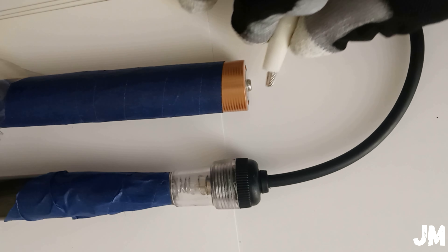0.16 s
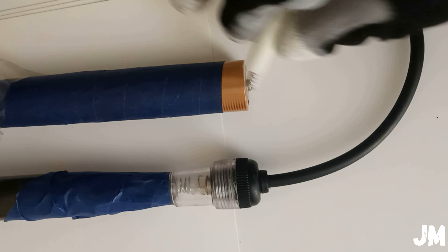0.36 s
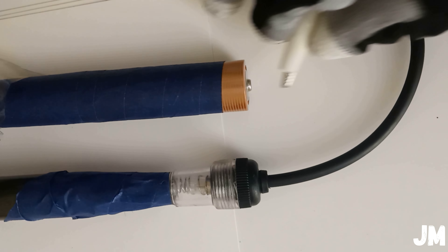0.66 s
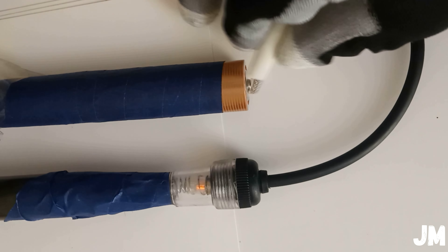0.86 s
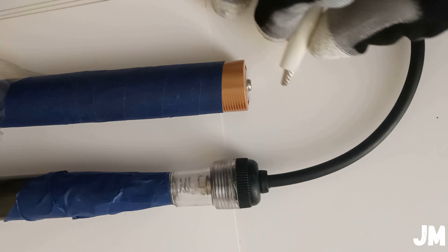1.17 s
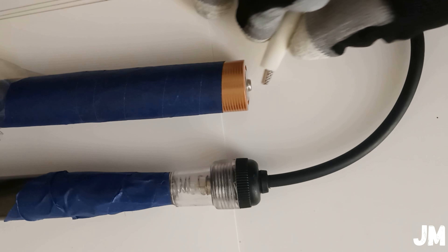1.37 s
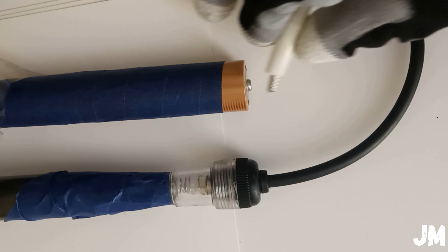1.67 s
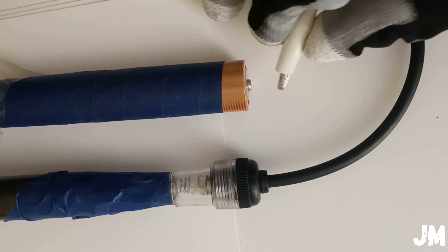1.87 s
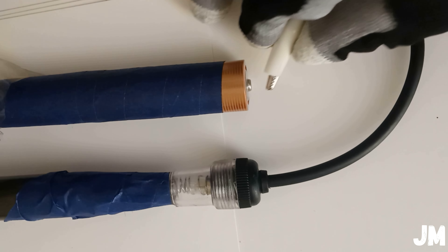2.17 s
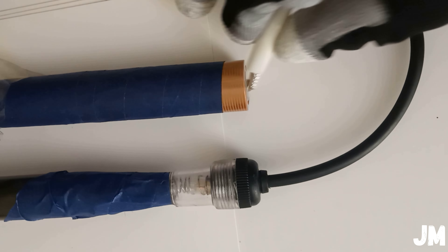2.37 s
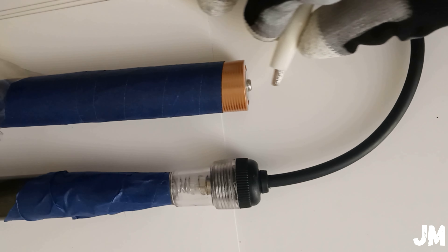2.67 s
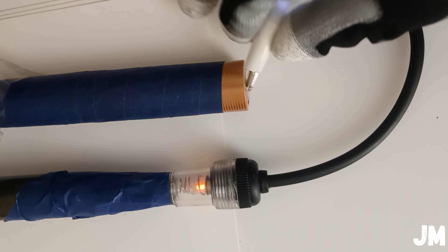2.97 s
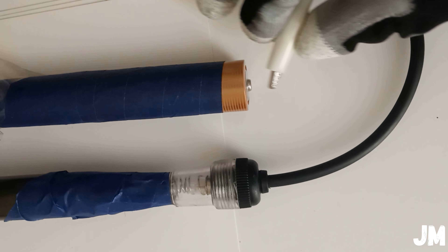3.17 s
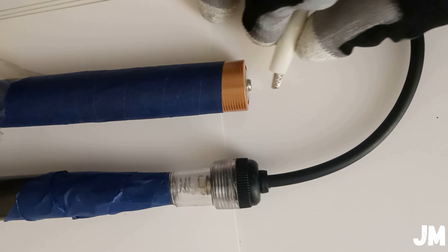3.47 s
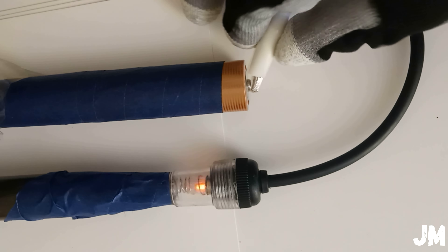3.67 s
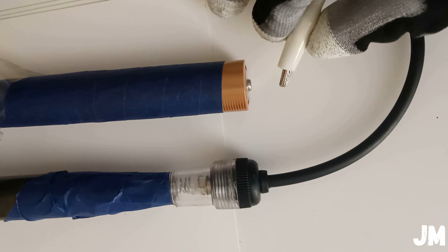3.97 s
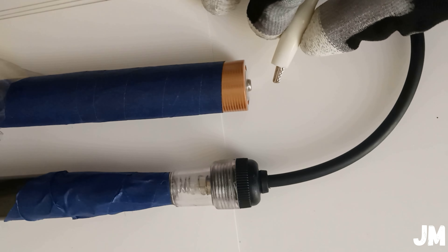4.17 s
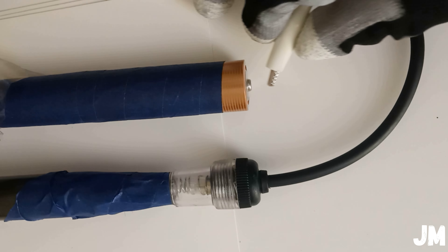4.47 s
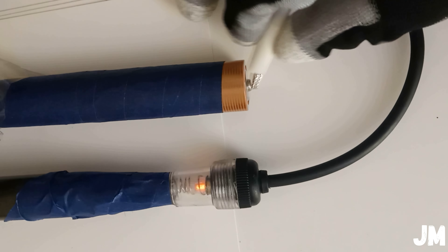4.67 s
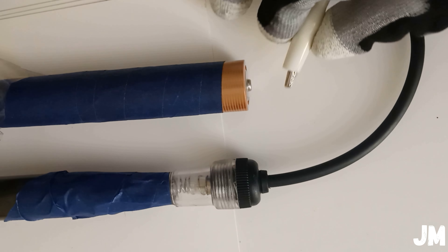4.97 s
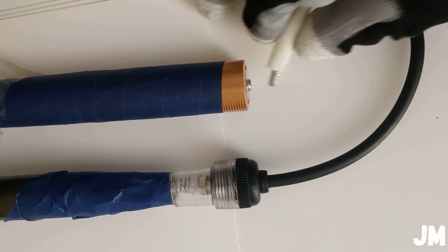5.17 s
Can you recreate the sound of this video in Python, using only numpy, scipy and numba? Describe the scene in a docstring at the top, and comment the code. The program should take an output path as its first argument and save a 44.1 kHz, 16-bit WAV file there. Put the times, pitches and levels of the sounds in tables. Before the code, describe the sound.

Quiet low hum and airy hiss, then hard electrical snaps: seven tight clusters over about five seconds, spaced fairly evenly. Each begins with a faint contact tick, then very loud, crisp cracks with a plasticky ring, a quick wall slap and a short reverberant fade. A gloved hand brushes the bench faintly at the start and more clearly before the sixth cluster. Close, slightly clipped phone sound.

```python
"""A small hard room with a bench: a wire is touched to a battery terminal, and a coil fires bursts of sparks
in a small plastic tester. Each snap is a shock and a crack of noise that ring the tester; it comes back
from a near wall and dies away in the room. A motor beats against the mains hum, with a fan, a whine, hissing
air and a faint tone that comes and goes. A glove brushes the bench twice.
A look-ahead limiter in the phone ducks everything around the snaps."""
import sys
import numpy as np
from scipy import signal
from scipy.fft import rfft, irfft, next_fast_len
from scipy.io import wavfile
from scipy.ndimage import uniform_filter1d, minimum_filter1d
from numba import njit

SR = 44100
rng = np.random.default_rng(int(sys.argv[2]) if len(sys.argv) > 2 else 0)


def natural_amplitude(level_db):
    """Convert a level in decibels to a linear amplitude factor, elementwise."""
    exponent = np.asarray(level_db, float) / 20
    return 10 ** exponent


def put_to_file(sound):
    """Save the sound as 16-bit audio at rate SR, in the file named by the first command-line argument."""
    columns = np.atleast_2d(sound).T  # one column per channel
    safe = np.clip(columns, -1, 1)
    whole_steps = np.round(safe * 32767)
    wavfile.write(sys.argv[1], SR, whole_steps.astype(np.int16))


N = 234819  # length of the scene in samples


def shade(x, table):
    """Colours a sound to follow (Hz, dB) points, with a minimum-phase filter that never sounds early."""
    hz, db = np.transpose(table)
    log_hz = np.log(np.fft.rfftfreq(2048, 1 / SR) + 1)
    log_gain = np.log(natural_amplitude(np.interp(log_hz, np.log(hz), db)))
    # folding the cepstrum onto positive times makes the filter causal
    fold = np.r_[1, 2 * np.ones(1023), 1, np.zeros(1023)]
    impulse = irfft(np.exp(rfft(irfft(log_gain) * fold)))
    return signal.fftconvolve(x, impulse)[:len(x)]


def unit(x):
    """Scales a sound to a root mean square of 1."""
    return x / np.sqrt(np.mean(x ** 2))


def walk(rate, size=N):
    """Random levels held 1 / rate seconds and smoothed twice; their spread is near 1."""
    hold = int(SR / rate)
    steps = np.repeat(rng.standard_normal(size // hold + 1), hold)
    return 1.3 * uniform_filter1d(uniform_filter1d(steps, hold), hold)[:size]


def add(out, x, s):
    """Mixes x into out from time s in seconds."""
    i = int(s * SR)
    out[i:i + len(x)] += x[:len(out) - i]


def air():
    """Room air and microphone hiss: noise whose rumble swells band by band under a steadier hiss."""
    # colour of the noise: pitch_hz [Hz], level_db [dB per Hz, relative]
    air_colour = [(20, -48.5), (44, -16.5), (86, -11.5), (147, -11.5), (184, -10), (240, -13), (297, -16),
                  (350, -19.5), (440, -17), (480, -31), (560, -34.5), (660, -36.5), (704, -30.5),
                  (750, -35.5), (1400, -40.5), (3500, -49.5), (5150, -46.5), (5300, -33), (5450, -43),
                  (5800, -43), (6700, -42), (7300, -60), (8600, -54), (9500, -45.5), (15700, -43.5),
                  (16000, -68.5)]
    level_db, surge_db, hiss_waver_db = -48.5, 2.5, 1.2
    size = next_fast_len(N)
    spectrum = rfft(unit(shade(rng.standard_normal(N), air_colour)), size)
    hz = np.fft.rfftfreq(size, 1 / SR)
    edges = [0, 90, 150, 220, 290, 370, 480, 800, SR]  # Hz; the last band is the hiss
    bands = [irfft(spectrum * (hz >= low) * (hz < high), size)[:N] for low, high in zip(edges, edges[1:])]
    rumble = sum(band * natural_amplitude(surge_db * walk(5)) for band in bands[:-1])
    hiss = bands[-1] * natural_amplitude(hiss_waver_db * walk(11))
    return natural_amplitude(level_db) * (rumble + hiss)


def hum():
    """Wavering sines: an appliance motor just under mains speed beats with the hum; a fan and a whine join."""
    # harmonics of the motor: multiple [of its base pitch], level_db [dB rms before the waver]
    motor_lines = [(1, -60.5), (2, -49.5), (3, -64), (5, -55.5)]
    # harmonics of the fan: multiple [of its base pitch], level_db [dB rms before the waver]
    fan_lines = [(1, -61.5), (2, -59)]
    motor_hz, fan_hz, mains_hum_hz, whine_hz = 59.11, 97.53, 120.05, 211.3
    mains_hum_db, whine_db, waver_db = -48, -61, 1.8
    in_step_s = 0.017  # all the lines are in step at this moment
    t = np.arange(N) / SR
    lines = [(multiple * motor_hz, db) for multiple, db in motor_lines]
    lines += [(multiple * fan_hz, db) for multiple, db in fan_lines]
    lines += [(mains_hum_hz, mains_hum_db), (whine_hz, whine_db)]
    tones = 0
    for hz, db in lines:
        tones = tones + natural_amplitude(db + waver_db * walk(9.5)) * np.sin(2 * np.pi * hz * (t - in_step_s))
    return np.sqrt(2) * tones  # a sine peaks at root 2 times its rms


def blips():
    """A faint steady-pitched tone comes and goes in smooth bell-shaped swells."""
    # swells of the tone: middle_s [s], level_db [dB rms at the middle], length_s [s between the 1/e points]
    tone_swells = [(1.002, -59.5, 0.12), (1.318, -61.5, 0.055), (2.125, -67, 0.09), (2.938, -61, 0.09),
                   (3.34, -62, .06), (3.64, -64, 0.091), (4.595, -62, 0.065)]
    pitch_hz = 702
    t = np.arange(N) / SR
    swell = sum(natural_amplitude(db) * np.exp(-((t - s) / (length / 2)) ** 2) for s, db, length in tone_swells)
    return np.sqrt(2) * swell * np.sin(2 * np.pi * pitch_hz * t)


def glove():
    """Cloth brushes the bench: rough noise around one pitch, with a quick rise and a slower fade."""
    # strokes: loudest_s [s], level_db [dB rms at the loudest], rise_s [s to climb the last 25 dB],
    # centre_hz [Hz], fuzz_db [dB of treble against the centre]
    strokes = [(0.004, -58.5, .011, 4450, -17.5), (3.701, -46, .024, 3960, -3.5)]
    fade_db_per_s, roughness_db = 331, 2.0
    out, t = 0, np.arange(N) / SR
    for s, db, rise, hz, fuzz_db in strokes:
        colour = [(0.74 * hz, -26), (0.77 * hz, -9), (hz, 0), (5200, -9), (6800, fuzz_db),
                  (8000, fuzz_db - 12), (9500, fuzz_db - 9), (13000, fuzz_db - 16.5)]
        rough_noise = rng.standard_normal(N) * natural_amplitude(roughness_db * walk(250))
        cloth = unit(shade(rough_noise, colour))
        drop_db = np.where(t < s, 25 * ((s - t) / rise) ** 2, fade_db_per_s * (t - s))
        out = out + cloth * natural_amplitude(db - drop_db.clip(0, 200))
    return out


def room(patchy_db=1.3):
    """Narrow bands of noise, each dying at its own rate and fluttering as echoes bunch; far walls join late."""
    # colour of the echoes: pitch_hz [Hz], level_db [dB per Hz, relative]
    room_colour = [(200, -16), (550, -15.5), (950, -6), (1500, -6), (2000, -8.5), (2600, -6.5),
                   (3300, -9.5), (5200, -5), (6600, -1.5), (7600, -10.5), (8200, -5.5), (9500, -3),
                   (11000, -7.5), (12600, -0.5), (15800, -2.5), (16100, -40)]
    # how long the room rings: pitch_hz [Hz], t60_s [s to fall 60 dB]
    room_t60 = [(400, 0.35), (1000, 0.27), (2800, 0.33), (7000, 0.28), (15000, 0.16)]
    t = np.arange(int(0.6 * SR)) / SR
    noise = unit(shade(rng.standard_normal(len(t)), room_colour))
    spectrum, hz = rfft(noise), np.fft.rfftfreq(len(t), 1 / SR)
    centres, t60s = np.transpose(room_t60)
    edges = 100 * 2 ** np.arange(0, 7.8, 1 / 8)  # Hz, eight bands to the octave
    tail = 0
    for low, high in zip(edges, edges[1:]):
        band = irfft(spectrum * (hz >= low) * (hz < high), len(t))
        flutter_db = patchy_db * walk(40, size=len(t))
        t60 = np.interp(np.log(low), np.log(centres), t60s)
        tail = tail + band * natural_amplitude(flutter_db - 60 * t / t60)
    tail = tail * natural_amplitude(0.37 * walk(400, size=len(t)))  # single echoes stand out across all bands
    build_up = 1 - np.exp(-t / 0.0011)
    far_walls = 1 - 0.13 * np.exp(-t / 0.075)
    return tail * build_up * far_walls


def snap(chance, colour, crack_t60):
    """A shock, then a crack scattered by bench and tools for a few milliseconds; both ring the tester."""
    # colour of the arc: pitch_hz [Hz], level_db [dB per Hz, relative]
    arc_colour = [(200, -26.5), (600, -14.5), (1000, -4.5), (2000, -20.5), (2800, -2.5), (3800, -9),
                  (4800, -6), (6600, -3), (7700, -5.5), (10000, -5), (12700, -5.5), (15800, -7.5),
                  (16600, -32)]
    # resonances of the plastic tester: pitch_hz [Hz], level_db [dB, relative], t60_s [s to fall 60 dB]
    tester_modes = [(1016, -13, 0.009), (2730, -11, 0.019), (3160, -10.5, 0.0028), (4330, -9.5, 0.0041),
                    (6740, 4.5, 0.012), (8350, -12.5, 0.036), (9660, 4.5, 0.004), (12850, -3, 0.012),
                    (16600, -11, .006)]
    shock_db = 13  # the first instant of the arc, before the mix below
    t = np.arange(len(chance)) / SR
    shock = natural_amplitude(shock_db) * (np.arange(len(t)) == 4)  # a single sample
    crack = unit(shade(chance, arc_colour)) * natural_amplitude(-60 * t / crack_t60) * (1 - np.exp(-t / 0.00045))
    ring = sum(natural_amplitude(db - 60 * t / t60) * np.sin(2 * np.pi * hz * t) for hz, db, t60 in tester_modes)
    push = shock + 0.7 * chance * natural_amplitude(-60 * t / (0.27 * crack_t60))
    rung = signal.fftconvolve(push, ring)[:len(t)]
    return shade(0.85 * crack + 0.066 * rung + 0.2 * shade(shock, arc_colour), colour)


def sparks():
    """Every snap with its smeared wall echo and room tail, and the thin snaps as the wire first touches."""
    # sparks: start_s [s], strength_db [dB], crack_t60_s [s to fall 60 dB], body_db [dB of mid tones],
    # echo_db [dB of wall echo against the snap]
    spark_list = [(0.4714, 8.5, 0.018, -3.5, -13.5), (0.4829, 6.5, 0.0089, -5, -21.5),
                  (1.02, -8, .009, -11, -18.5), (1.0317, -6, 0.0082, -6.5, -19),
                  (1.0541, 10.5, 0.0042, -4, -20), (1.0783, 11.5, 0.011, -3.5, -14.5),
                  (1.6533, 4.5, 0.02, -4, -12.5), (1.701, 9.5, 0.0081, 1, -20),
                  (2.4696, 10, 0.0055, -0.5, -10.5), (2.474, 4, 0.014, 4.5, -11),
                  (2.5046, 4, 0.0078, -3, -18), (3.1057, 4.5, 0.0056, 3, -17.5),
                  (3.1218, 8, 0.0064, 3, -21), (3.135, 9, 0.0076, 2, -15.5), (3.146, 12, 0.0052, 3, -15.5),
                  (3.8281, 8.5, 0.01, 6, -17), (3.8349, 11.5, 0.012, -2, -11), (4.836, 6, 0.014, 8, -11),
                  (4.8696, 11.5, 0.016, -1.5, -18), (4.8806, 7.5, 0.0064, -5, -22)]
    # the wire first touches the terminal: start_s [s], strength_db [dB]
    touch_list = [(0.4507, -27.5), (1.0177, -23), (1.608, -21.5), (2.415, -24.5), (3.086, -26),
                  (3.7793, -28), (4.8018, -25.5)]
    wall_s, room_db, touch_room_db = 0.0102, -20.5, -18
    # a fuller or stronger spark has more bass (dB, dB per dB, dB per dB)
    base_bass_db, bass_per_body, bass_per_strength = -2, 0.62, 0.2
    wall = [(1500, -4), (5000, 6.5)]  # (Hz, dB): the wall returns mostly treble
    thin = [(1200, -29.5), (2500, 3.0), (7000, 3.0), (10000, -5.5)]  # (Hz, dB): a small contact has no bass
    out, tail = np.zeros(N), room()
    # two noises for each snap: one for the direct sound, one for the echo
    chance = rng.standard_normal((len(spark_list) + len(touch_list), 2, 1024))
    swell = np.minimum(np.arange(1024) / (0.001 * SR), 1)  # the echo fades in over 1 ms
    for (s, db, t60, body_db, echo_db), (direct, back) in zip(spark_list, chance):
        bass_db = base_bass_db + bass_per_body * body_db + bass_per_strength * db
        colour = [(400, 2 * bass_db - 6.5), (1100, bass_db), (3000, body_db), (5500, 0)]
        echo = swell * shade(snap(back, colour, 0.0077), wall)
        add(out, natural_amplitude(db) * snap(direct, colour, t60), s)
        add(out, natural_amplitude(db + echo_db) * echo, s + wall_s)
        add(out, natural_amplitude(db + room_db) * shade(tail, colour), s)
    for (s, db), (direct, _) in zip(touch_list, chance[len(spark_list):]):
        add(out, natural_amplitude(db) * snap(direct, thin, 0.012), s)
        add(out, natural_amplitude(db + touch_room_db) * shade(tail, thin), s)
    return out


def scene():
    """Background, glove and sparks summed at one microphone."""
    return (air() + hum() + blips() + glove() + sparks())[None]


@njit
def recover(gain, release):
    """Lets the gain fall at once and climb back slowly."""
    out, g = np.empty(len(gain)), 1.
    for i in range(len(gain)):
        g = min(gain[i], g + (1 - g) * release)
        out[i] = g
    return out


def limiter(dry):
    """The phone sees loud passages coming, turns down ahead of them and recovers."""
    ahead, ramp = int(0.026 * SR), int(0.012 * SR)
    loudness = np.sqrt(uniform_filter1d(dry[0] ** 2, size=88) + 1e-12)  # rms over 2 ms
    need = np.minimum(1, 0.5 / loudness)
    held = minimum_filter1d(np.r_[need, np.ones(ahead)], ahead)[ahead // 2:][:N]
    recovered = recover(held, 1 / (0.035 * SR))  # climbs back with a 35 ms time constant
    # the ramp lags, so the gain is lowest at the peak
    gain = uniform_filter1d(recovered, ramp, origin=ramp // 2 - 1)
    return dry * gain


def top_cut(x):
    """Nothing passes above the cut-off."""
    return signal.sosfilt(signal.butter(12, 16640, fs=SR, output="sos"), x)


def record(dry):
    """The limiter ducks the snaps, the overloaded microphone bends the wave and the peaks left over clip."""
    lopsided = 0.04  # the microphone gives way more on one side, which thumps
    limited = limiter(dry)
    bent = limited + lopsided * limited ** 2
    return top_cut(np.clip(bent, -1, 1))


dry = scene()
out = record(dry)
put_to_file(out)
```